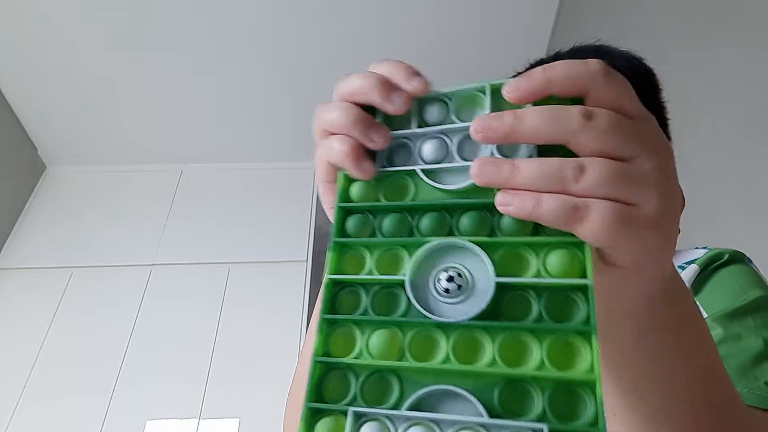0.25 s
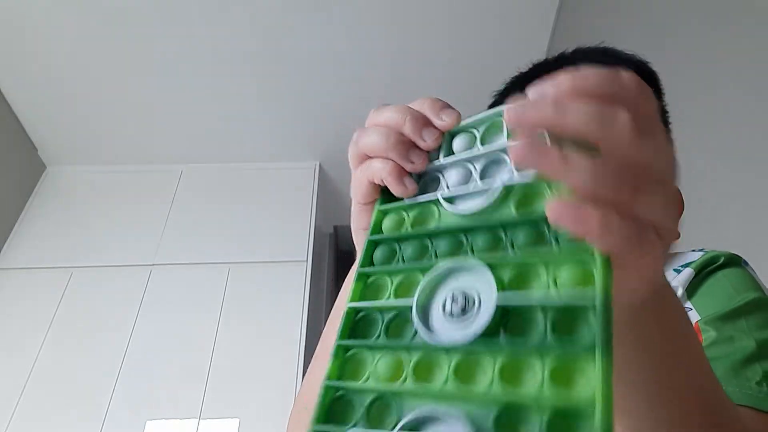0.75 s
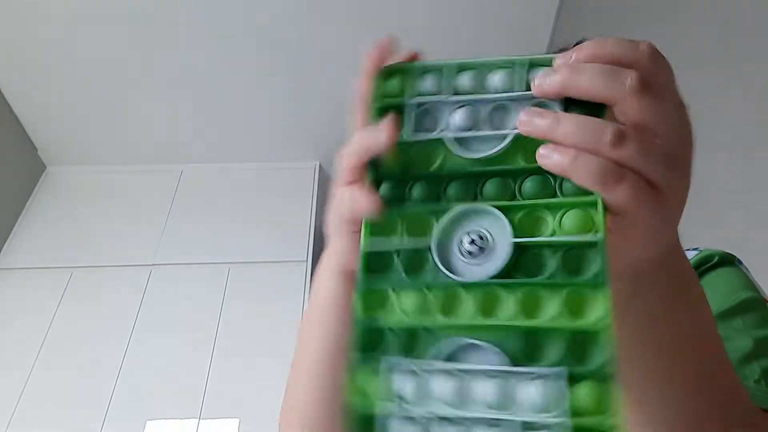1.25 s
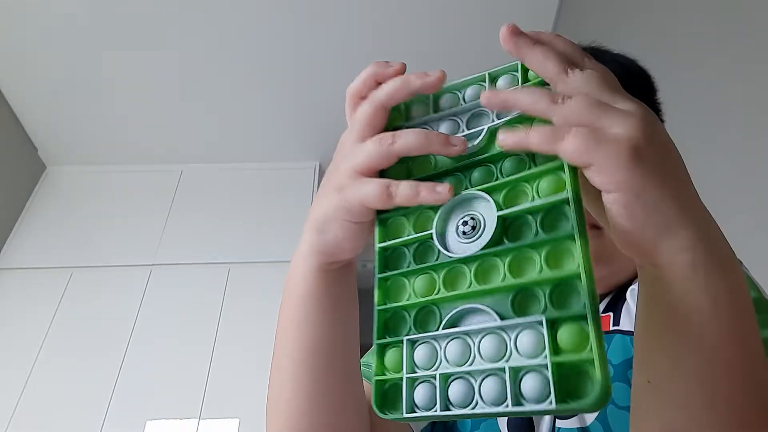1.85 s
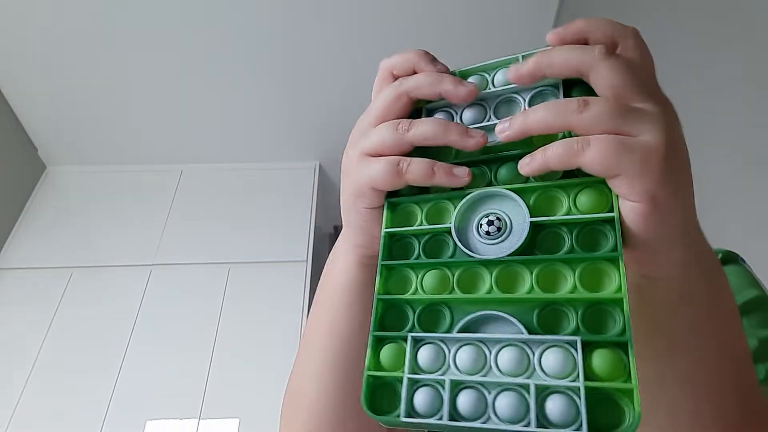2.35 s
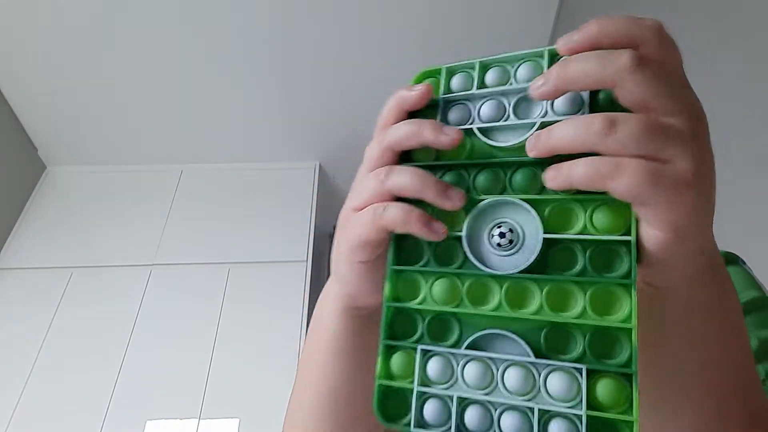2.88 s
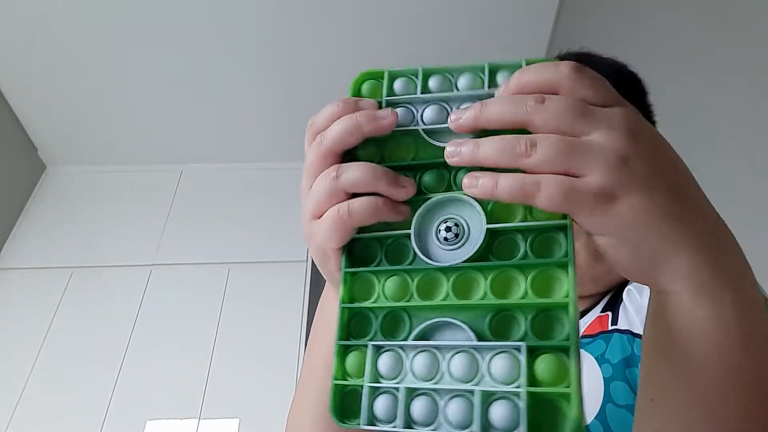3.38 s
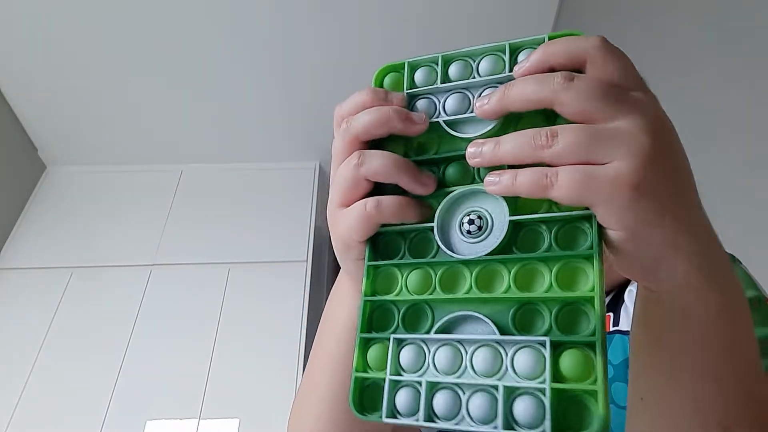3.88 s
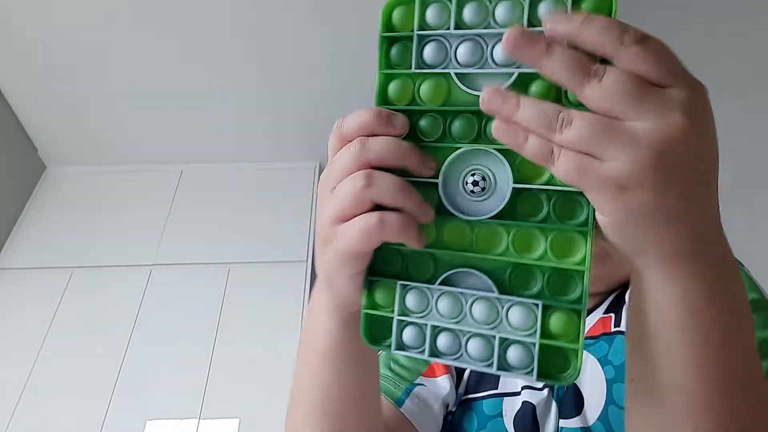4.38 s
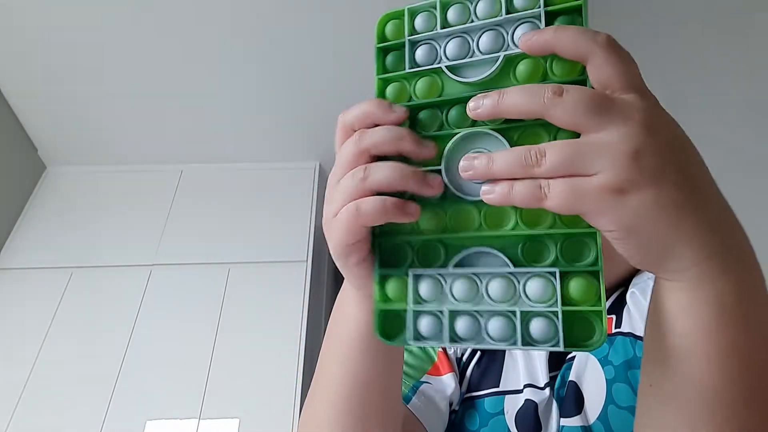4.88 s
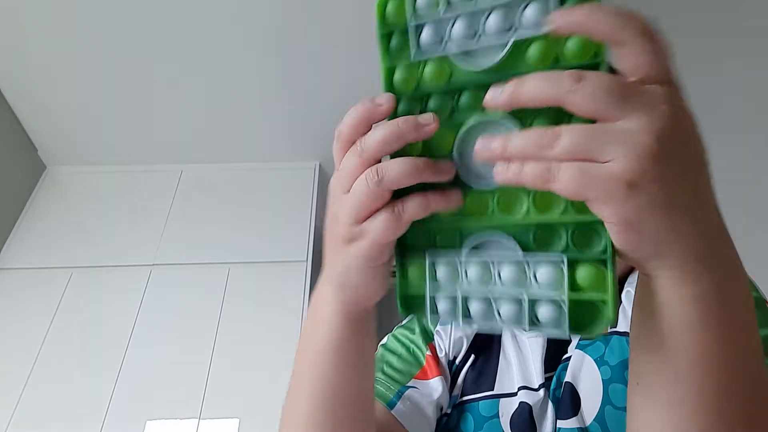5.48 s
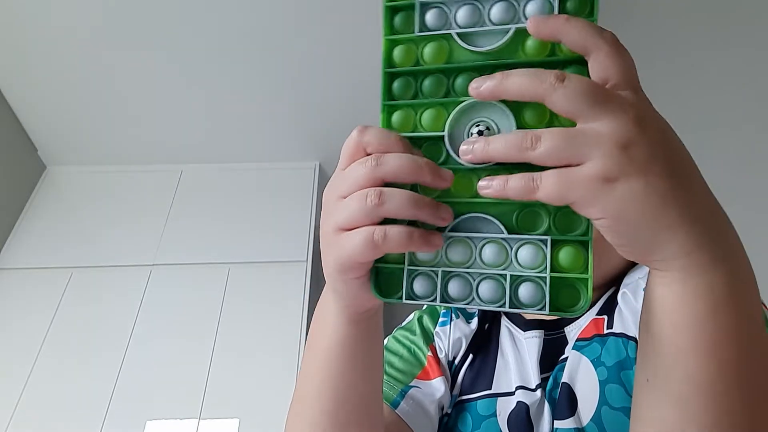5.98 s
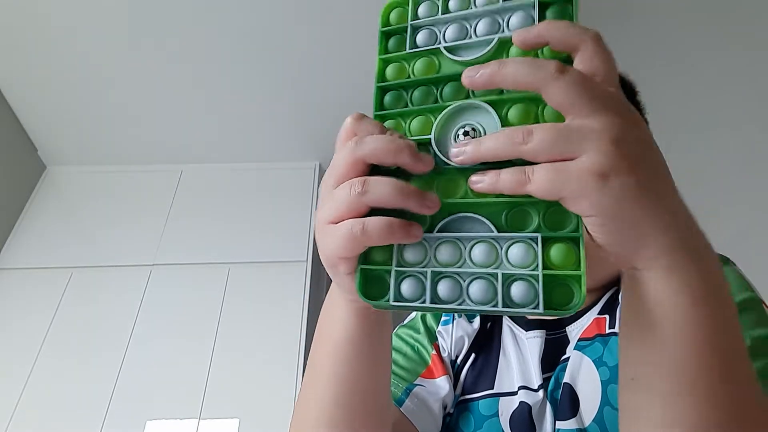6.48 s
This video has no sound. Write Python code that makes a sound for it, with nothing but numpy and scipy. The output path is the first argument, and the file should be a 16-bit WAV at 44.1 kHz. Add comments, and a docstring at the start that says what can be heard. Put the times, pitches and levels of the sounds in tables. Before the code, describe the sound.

Close stereo sound of fingers popping silicone bubbles in a small, hard-walled room, slightly left of centre. Quiet air, a very faint low hum and soft handling rumble run throughout. A brief rub opens, then crisp hollow pops at 0.24, a quick double snap at 0.68, and 1.03. Light fingertip ticks patter from 1.1 to 1.4. After a gap, pops follow at 1.98, 2.34 and 2.50, then 3.03. Soft touches and a dull thump come around 3.7. Two strong pops hit at 4.0 and 4.08, the second loudest, with a low thump just after. Faint taps and skin rubs lead to a pop at 4.86, a weak crackly double with a thump at 5.2, and a ringing pop at 5.31. Quiet rubbing and touches follow, then a soft pop at 6.16 and clear ones at 6.27, 6.43 and 6.55. Each is millisecond-sharp, rubbery, with a short bright reverberation.

```python
"""Silicone domes of a popping toy buckle under the fingers, close to a microphone in a small room.
Each snap-through is a millisecond pulse of air with brief resonances; wall echoes and a diffuse tail answer.
Fingertip impacts tick on the rubber, stick-slip friction rubs and hisses, and the sheet thumps dully,
alone or under a pop; handling rumble, still air and a faint hum lie underneath.
Filtered noise makes the random sounds, minimum-phase pulses the impacts and sines the hum."""
import sys
import numpy as np
from scipy import signal
from scipy.fft import rfft, irfft
from scipy.io import wavfile

SR = 44100
rng = np.random.default_rng(int(sys.argv[2]) if len(sys.argv) > 2 else 0)


def put_to_file(sound):
    """Save the sound as 16-bit audio at rate SR, in the file named by the first command-line argument."""
    columns = np.atleast_2d(sound).T  # one column per channel
    safe = np.clip(columns, -1, 1)
    whole_steps = np.round(safe * 32767)
    wavfile.write(sys.argv[1], SR, whole_steps.astype(np.int16))


N = 297234

# One snap a row; a dome that flips in two steps has two rows.
# Ring and zing are its low and high resonance, top is where its treble falls:
#   t/s, level/dB, ring f/Hz, ring/dB, zing f/Hz, zing/dB, hollow f/Hz, hollow/dB,
#   snap/dB above 1.9 kHz, crack/dB above 4.5 kHz, top f/Hz,
#   near echo delay/ms, near echo factor, room level/dB, room treble/dB
POPS = [(0.239, 9.5, 1087, 9, 4200, 10.5, 434, -5.5, 6, -10.5, 10650, 0.96, 0.2, 1.5, 0.5),
        (0.6746, 7, 1084, 7, 7950, 11, 690, -0.5, 14.5, -15, 12680, 1.5, -0.32, 3.5, 4.5),
        (0.6828, 13, 1544, 5, 8320, 9.5, 708, -8, 7, 5, 14100, 1.24, 0.67, -10.5, 3),
        (1.0284, 11, 600, 2, 6950, 7, 894, -17, 7.5, -12, 13000, 2.2, -0.28, -2.5, 5.5),
        (1.9779, 14, 636, 4.5, 2800, 2, 958, -15, 8.5, -6, 8700, 0.94, 0.27, 0.5, -4.5),
        (2.344, 10.5, 941, 4.5, 4400, 7.5, 678, -5.5, 11.5, -23, 11200, 0.93, 0.26, -1, 3.5),
        (2.5043, 14, 1419, 5, 4350, 9, 832, -5, 1.4, -11.5, 9350, 2.18, -0.3, -2.5, 7.5),
        (3.0253, 10, 1026, 10.5, 3460, 7, 900, -18.5, 1.5, -7.5, 8370, 2.24, -0.22, -1.5, 12.5),
        (3.9957, 17, 1071, 6.6, 7100, 7, 820, -9.5, 9.5, -19, 13700, 0.51, 0.2, -3.5, 4.5),
        (4.0756, 24, 1025, 3, 7060, 10, 2450, -7, 1.2, -9, 10350, 2.18, -0.14, -6.5, 2.5),
        (4.8605, 9, 1490, 8, 3420, 2, 896, -12.5, 6, -1, 7070, 0.66, -0.18, -2, 1),
        (5.1968, -10.5, 900, -10, 8300, 12.5, 1700, -9, -4.5, 18.5, 11630, 0.91, 0.11, 0, -6),
        (5.1993, -2, 1284, 6.5, 4120, 5, 2760, -24, 0.5, 1.5, 11500, 0.87, 0.23, -1, 4),
        (5.3104, 9.5, 902, 11, 5360, 13.5, 1782, -14, 9, -15, 10390, 1.55, 0.26, 0, 5.5),
        (6.156, -6, 1300, 14.5, 7200, 6, 2100, -21.5, 2, 9.5, 6030, 1.52, -0.18, 0.5, 1),
        (6.2733, 12, 1250, 5.5, 5050, 10, 463, -2.5, 2.5, -9, 13600, 2.15, 0.33, -2, 3),
        (6.4252, 7.5, 1330, 10.5, 6740, 15, 1850, -7.5, 11, -9.5, 16100, 2.33, -0.33, -1, 1.5),
        (6.5498, 16.5, 626, 6, 3210, 13, 2196, -23.5, -1, -3, 10500, 0.89, 0.38, -3, 2)]
# Spectrum common to all domes, before each pop's own level: f/Hz, level/dB
DOME_SPECTRUM = [(20, -42), (100, -25), (170, -25.5), (215, -37), (310, -14), (620, -4.5), (1200, -0.5),
                 (2100, -8), (3200, -21.5), (3800, -27), (4400, -28.5), (7500, -34.5), (10000, -38),
                 (15000, -43)]
# Position of the pops and damping of their ring: t/s, left-right level/dB, ring half-width / ring frequency
PLACE = [(0.24, 4.5, .09), (0.8, 7, 0.048), (2.3, 3, 0.13), (4.05, 4, 0.075), (4.86, 2.3, 0.073),
         (5.3, 3.5, 0.19), (6.2, 2.5, 0.26)]
# Fingertips landing on or leaving the rubber, before the common trim and panning:
#   t/s, peak level/dB, ring f/Hz, treble/dB, thud/dB
TAPS = [(0.403, -48.5, 854, -1.5, -8), (1.113, -39, 1735, 14.5, -2.5), (1.174, -41, 1925, 17, -13),
        (1.215, -50.5, 1240, 10, -12), (1.314, -56.5, 1840, 6, -4), (1.359, -46, 1760, -22, -5.5),
        (1.377, -44, 1796, -14, -3.5), (1.417, -49, 832, -18, 0.5), (2.102, -39, 1830, 3, 1),
        (2.132, -51, 972, 0.5, 8), (2.26, -59, 1765, -1, 6.5), (3.175, -55, 876, -0.5, 3.5),
        (3.25, -53, 923, -13.5, 7), (3.701, -50, 845, -2.5, -3), (4.172, -43.5, 2140, 10, -11),
        (4.252, -42, 1000, -5, 4), (4.356, -51, 1200, -11.5, 10), (4.373, -46.5, 1073, -27, 16),
        (4.457, -54, 1773, -9, 22), (4.647, -52.5, 1018, -8, 7), (4.91, -47, 1083, -1, 11),
        (4.996, -43.5, 1800, 0.5, -6.5), (5.089, -55.5, 955, -6.5, -8), (5.451, -53.5, 1150, 2, -2),
        (5.922, -50, 953, 12, -11), (6.091, -52.5, 851, -12.5, 18), (6.237, -47, 1846, -15, 3)]
# Spectrum common to all taps: f/Hz, level/dB
TAP_SPECTRUM = [(60, -24.5), (300, -15), (600, -2), (1000, 0.5), (2200, 0.5), (2900, -9.5), (3800, -19.5),
                (7500, -26.5), (14000, -43.5)]
# Dull low thumps of the sheet, alone or under a pop: t/s, level/dB added to the thud spectrum
THUDS = [(3.698, -8.5), (3.713, -19.5), (3.751, -24), (4.106, -6.5), (5.202, -9.5)]
# Spectrum of the thumping sheet: f/Hz, level/dB
THUD_SPECTRUM = [(30, -37), (55, -14), (95, 3.5), (170, -3.5), (220, -6.5), (330, 4), (600, -14.5),
                 (1500, -28), (3500, -29), (5500, -30), (8000, -44.5), (15000, -57.5)]
# Skin sliding on silicone, before the common trims and panning: start t/s, length/s, rub level/dB, hiss level/dB
STROKES = [(0.0, 0.047, -53.5, -63.5), (0.087, 0.08, -74, -79), (1.298, 0.13, -67, -69.5),
           (2.6, .24, -74, -82), (4.309, 0.11, -61, -80.5), (4.422, .06, -70, -80),
           (4.688, 0.087, -72, -86.5), (5.085, 0.033, -63, -77), (5.585, 0.096, -63, -76),
           (5.713, 0.057, -62, -76.5), (5.953, 0.063, -74, -89.5), (6.193, 0.33, -65.5, -88)]
# Spectral shape of the stick-slip ticks: f/Hz, level/dB
RUB_SPECTRUM = [(300, -28.5), (700, -4), (1000, 7), (1400, -5.5), (1900, 3), (2700, -8), (3800, -22.5),
                (6000, -34)]
# Spectral shape of the friction hiss: f/Hz, level/dB
HISS_SPECTRUM = [(2500, -23.5), (5000, 1), (8000, 1.5), (10000, -6), (12000, -2.5), (16000, -14.5)]
# The hands shift their grip and the sheet sways: middle t/s, length/s, rumble level/dB
SHIFTS = [(0.264, 0.056, -58.5), (0.63, 0.077, -59.5), (0.924, 0.06, -63.5), (1.502, 0.11, -60.5),
          (2.56, 0.11, -63.5), (3.2, .45, -67.5), (3.38, 0.032, -63), (4.09, .08, -57.5),
          (4.75, 0.22, -64.5), (5.537, .06, -63.5)]
# Spectral shape of the sway: f/Hz, level/dB
SWAY_SPECTRUM = [(20, -36.5), (45, -9.5), (63, 0), (85, -4), (125, -11), (180, -16.5), (300, -33),
                 (900, -65)]
# Spectral shape of the handling rumble: f/Hz, level/dB
RUMBLE_SPECTRUM = [(15, -36.5), (30, -19), (46, -10), (62, 3), (80, -5), (120, -4), (175, -5.5), (215, -19),
                   (290, -13), (450, -32.5), (900, -54.5)]
# Spectral shape of the still air: f/Hz, level/dB
AIR_SPECTRUM = [(20, -17), (60, -3.5), (130, -2.5), (170, 0.5), (220, -6.5), (320, -2.5), (480, -10.5),
                (1000, -15.5), (2500, -23), (6000, -29.5), (9500, -29.5), (12000, -25.5), (15500, -28)]
# Steady hum tones: f/Hz, rms level/dB
HUM = [(63.5, -75.5), (316, -86.5)]
# Nearest walls and ceiling, against the sound sent into the room: delay/s, left level/dB, right level/dB
WALLS = [(0.0097, -22.5, -22.5), (0.018, -31.5, -28), (.021, -29.5, -37), (0.023, -27.5, -28),
         (.034, -28, -29.5), (0.0386, -30, -29)]
# Diffuse reverberation, against the sound sent into the room: f/Hz, level/dB, decay time t60/s
ROOM = [(99, -0.5, 0.99), (300, -13.5, 0.094), (710, -14, 0.27), (1170, -17, .29), (2160, -13.5, 0.24),
        (3140, -10, 0.26), (4400, -0.5, 0.25), (5900, -6, 0.24), (8150, -5.5, 0.23), (10000, -9, 0.27),
        (15000, -4.5, .22)]
# Difference of the two microphone ports for the pops: f/Hz, left-right level/dB
PORTS = [(200, 2), (1300, 1.5), (2200, 3), (3300, 0), (4500, -8), (7800, -8.5), (9800, 5), (14000, -4)]
# Balance of diffuse sound: f/Hz, left-right level/dB
DIFFUSE_PAN = [(50, -0.5), (300, 5.5), (1500, 3), (4000, 0), (8000, -1), (10500, 2.5), (15000, 1)]
# Correlation of diffuse sound between the ports: f/Hz, coefficient
LIKENESS = [(50, 0.78), (400, 0.8), (1000, 0.12), (2000, 0.033), (5000, 0.012)]

PULSE_SAMPLES = 4096
HZ = np.fft.rfftfreq(PULSE_SAMPLES, 1 / SR)
EDGE_HZ = 15800  # the microphone's upper band limit
PORT_LAG_S = 0.00002  # the toy is a little nearer the left port
AIR_DB = -75
HOLD_DB = -69.5  # rumble of hands that only hold the toy
JOLT_DB, JOLT_RISE_S, JOLT_FADE_S = -75.5, 0.015, 0.061  # shake of the sheet, level against the pop's level
STROKE_PEAK, STROKE_ENDS_DB = 0.1, -12  # loudest at this share of the length; ends against that peak
BRUSHES_PER_S, BRUSH_DB, BRUSH_SPREAD_DB, BRUSH_HZ = 6, -71, 2, 1700  # level before the taps' common trim
# All domes move about the same air, so a soft pop has more body: dB at level 0, dB lost per dB, limit
BODY_DB, BODY_SLOPE, BODY_MOST_DB = 13, 0.86, 7


def gain_of(db):
    """Amplitude ratio: 20 dB is a factor of ten."""
    return 10 ** (np.asarray(db) / 20)


def evened(x):
    """Power normalisation: scales to rms 1."""
    return x / np.sqrt(np.mean(x ** 2) + 1e-20)


def read(points, hz, order=1):
    """Interpolation of one table column on a logarithmic frequency axis."""
    table = np.transpose(points)
    return np.interp(np.log(hz + 1), np.log(table[0] + 1), table[order])


def add(mix, s, sound):
    """Superposition: adds a sound to the mix from time s."""
    part = mix[..., round(s * SR):][..., :sound.shape[-1]]
    part += sound[..., :part.shape[-1]]


def bell(hz, width):
    """Lorentzian resonance curve of height 1 and the given half-width."""
    return 1 / (1 + ((HZ - hz) / width) ** 2)


def above(hz, order):
    """High-pass weighting: a smooth step from 0 to 1 at hz."""
    return 1 / (1 + (hz / (HZ + 1)) ** order)


def pulse(db):
    """Minimum phase: the most sudden causal pulse with this spectrum."""
    both_halves = np.r_[db, db[-2:0:-1]]
    log_gain = np.log(gain_of(np.maximum(both_halves, -110)))
    return irfft(np.exp(np.conj(signal.hilbert(log_gain)))[:len(HZ)])


def sides(pan_db):
    """Constant-power panning: left and right dB for a left-right difference."""
    right_db = -10 * np.log10((1 + gain_of(pan_db) ** 2) / 2)
    return np.array([right_db + pan_db, right_db])


def coloured(x, spectrum):
    """Linear filtering by a spectrum, normalised to rms 1."""
    hz = np.fft.rfftfreq(N, 1 / SR)
    return evened(irfft(rfft(x) * gain_of(read(spectrum, hz)), N))


def diffuse(pair):
    """Spatial coherence of a diffuse field: two unrelated signals become alike in the bass."""
    size = pair.shape[1]
    hz = np.fft.rfftfreq(size, 1 / SR)
    a, b = rfft(pair)
    same = read(LIKENESS, hz)
    ports = np.array([a, same * a + np.sqrt(1 - same ** 2) * b])
    return irfft(ports * gain_of(sides(read(DIFFUSE_PAN, hz))), size)


def background(waver_rad=0.55):
    """Diffuse broadband noise of still air, and a hum of phase-modulated sines."""
    t = np.arange(N) / SR
    air = gain_of(AIR_DB) * coloured(diffuse(rng.standard_normal((2, N))), AIR_SPECTRUM)
    drift = np.interp(t, np.linspace(0, t[-1], 20), rng.standard_normal(20))
    hum = np.zeros(N)
    for hz, db in HUM:
        hum += gain_of(db) * np.sqrt(2) * np.sin(2 * np.pi * hz * t + waver_rad * drift)
    return air + hum


def rumble():
    """Forced vibration of the held sheet: steady, jolted by each pop, swaying at each shift of grip."""
    t = np.arange(N) / SR
    jolt_power, sway_gain = np.zeros(N), np.zeros(N)
    for s, db, *_ in POPS:
        time_constant = np.where(t < s, JOLT_RISE_S, JOLT_FADE_S)
        jolt_power += gain_of(db + JOLT_DB) ** 2 * np.exp(-2 * abs(t - s) / time_constant)
    for s, length, db in SHIFTS:
        sway_gain += gain_of(db) * np.exp(-2 * ((t - s) / length) ** 2)
    shake = coloured(diffuse(rng.standard_normal((2, N))), RUMBLE_SPECTRUM)
    shake = shake * np.sqrt(gain_of(HOLD_DB) ** 2 + jolt_power)
    return shake + coloured(rng.standard_normal(N), SWAY_SPECTRUM) * sway_gain


def rubs(slips_per_s=700, rub_trim_db=-2, hiss_trim_db=-4):
    """Stick-slip friction: skin on rubber gives tiny uneven ticks under a hiss, swelling with each stroke."""
    t, out = np.arange(N) / SR, np.zeros(N)
    ticks = (rng.random(N) < slips_per_s / SR) * rng.standard_normal(N)
    slips = coloured(ticks, RUB_SPECTRUM)
    hiss = coloured(rng.standard_normal(N), HISS_SPECTRUM)
    for s, length, slip_db, hiss_db in STROKES:
        ends_and_peak_db = [STROKE_ENDS_DB, 0, STROKE_ENDS_DB]
        swell_db = np.interp((t - s) / length, [0, STROKE_PEAK, 1], ends_and_peak_db, -np.inf, -np.inf)
        friction = slips * gain_of(rub_trim_db + slip_db) + hiss * gain_of(hiss_trim_db + hiss_db)
        out += gain_of(swell_db) * friction
    return out


def room(x, first_s=0.0093, rise_s=0.0027, full_s=0.025, near=0.13, echoes_per_s=6000):
    """Reverberation: wall reflections, then a dense exponential tail whose fine pattern drifts slowly with time."""
    size = SR * 2 // 3
    out, t = np.zeros((2, N)), np.arange(size) / SR
    for s, *levels_db in WALLS:
        add(out, s, gain_of(levels_db)[:, None] * x)
    # only hands and body reflect before the first wall answers
    build_s = [0, 0.002, first_s, first_s + rise_s, full_s]
    build = np.interp(t, build_s, [0, near, near, 0.6, 1])
    for k in range(3):
        sparse = rng.standard_normal((2, size)) * (rng.random((2, size)) < echoes_per_s / SR)
        hz, at, z = signal.stft(evened(diffuse(sparse)), SR, nperseg=256)
        t60 = read(ROOM, hz, order=2)[:, None]
        decay_db = read(ROOM, hz)[:, None] - 60 * (at - full_s) / t60
        unit_energy = np.sqrt(np.log(1e6) / (t60 * SR))
        z = z * gain_of(decay_db) * unit_energy
        tail = signal.istft(z, SR, nperseg=256)[1][:, :size] * build
        # three unrelated tails take turns at constant total power
        turn = np.sqrt(2 / 3) * np.cos(np.pi * (np.arange(N) / SR / 2 + k / 3))
        out += signal.fftconvolve((x * turn)[None], tail, axes=1)[:, :N]
    return out


def tap(db, hz, treble_db, thud_db, ring_db=11, ring_width_hz=150, scuff=0.23,
        landing_s=0.0044, scuff_s=0.0019, trim_db=-2):
    """Soft impact: a swelling scuff, a tick that excites the dome's resonance, then a dying scuff."""
    t = np.arange(-PULSE_SAMPLES // 2, PULSE_SAMPLES // 2) / SR  # the tick is at 0, mid-array
    pressure = np.exp(-abs(t) / np.where(t < 0, landing_s, scuff_s))
    colour = read(TAP_SPECTRUM, HZ) + ring_db * bell(hz, ring_width_hz)
    colour = colour + treble_db * above(4700, order=4) + thud_db * (1 - above(600, order=4))
    touch = (t == 0) + scuff * rng.standard_normal(len(t)) * pressure
    tick = signal.fftconvolve(touch, pulse(colour))[:len(t)]
    return gain_of(db + trim_db) * tick / abs(tick).max()


def brushes(treble_db=-2, thud_db=0):
    """Random point process: idle fingers graze the domes now and then."""
    when = rng.random(N) < BRUSHES_PER_S / SR
    strength = gain_of(BRUSH_SPREAD_DB * rng.standard_normal(N))
    return signal.oaconvolve(when * strength, tap(BRUSH_DB, BRUSH_HZ, treble_db, thud_db), "same")


def scattered(snap, share_db=-1, from_hz=2600, fade_s=0.0016):
    """Scattering: fingers and ribs of the sheet spread a snap's short waves over a few milliseconds."""
    t = np.arange(PULSE_SAMPLES) / SR
    paths = rng.standard_normal(PULSE_SAMPLES) * np.exp(-t / fade_s)
    short_waves = pulse(share_db + 20 * np.log10(above(from_hz, order=3)))
    spray = signal.fftconvolve(paths / np.linalg.norm(paths), short_waves)[:PULSE_SAMPLES]
    return snap + signal.fftconvolve(snap, spray)[:PULSE_SAMPLES]


def pops(snap_hz=1900, crack_hz=4500, body_hz=450, hollow_width_hz=70, zing_width_hz=300, top_db=-18,
         echo_top_hz=5000, room_ring=0.58, room_hollow=0.26, room_treble_hz=4000):
    """Snap-through buckling: each snap is an air pulse that rings; returns direct pair and room feed."""
    direct, spread = np.zeros((2, N)), np.zeros(N)
    place_s, pans_db, dampings = np.transpose(PLACE)
    for (s, db, ring_hz, ring_db, zing_hz, zing_db, hollow_hz, hollow_db, snap_db, crack_db, top_hz,
         echo_ms, echo, room_db, room_treble_db) in POPS:
        pan_db = np.interp(s, place_s, pans_db)
        ring_width_hz = ring_hz * np.interp(s, place_s, dampings)
        body_db = min(BODY_DB - BODY_SLOPE * db, BODY_MOST_DB)
        flip = db + read(DOME_SPECTRUM, HZ) + body_db * (1 - above(body_hz, order=4))
        # each pop has its own brightness and its own treble cut-off
        flip = flip + snap_db * above(snap_hz, order=4) + crack_db * above(crack_hz, order=6)
        flip = flip + top_db * above(top_hz, order=16)
        # the cup's main mode and a high one
        ring = ring_db * bell(ring_hz, ring_width_hz) + zing_db * bell(zing_hz, zing_width_hz)
        # front and back of the sheet cancel
        hollow = hollow_db * bell(hollow_hz, hollow_width_hz)
        # interference with the echo off hands and chest
        delay = np.exp(-2j * np.pi * HZ * echo_ms / 1000)
        comb = 20 * np.log10(abs(1 + echo * delay * (1 - above(echo_top_hz, order=2))))
        near_db = flip + ring + hollow + comb
        ports_db = sides(pan_db + read(PORTS, HZ))
        add(direct, s, -np.array([scattered(pulse(near_db + port_db)) for port_db in ports_db]))
        room_colour = room_db + room_treble_db * above(room_treble_hz, order=4)
        add(spread, s, -pulse(flip + room_ring * ring + room_hollow * hollow + room_colour))
    return direct, spread


def taps():
    """Impact excitation: the clear fingertip touches, each tick falling at its listed time."""
    out = np.zeros(N)
    for s, *touch in TAPS:
        add(out, s - PULSE_SAMPLES / 2 / SR, tap(*touch))
    return out


def thuds(flutter=0.035, flutter_s=0.012):
    """Damped impulse response: dull low thumps of the sheet, alone or under a pop, with a brief flutter."""
    out, t = np.zeros(N), np.arange(PULSE_SAMPLES) / SR
    for s, db in THUDS:
        push = (t == 0) + flutter * rng.standard_normal(len(t)) * np.exp(-t / flutter_s)
        add(out, s, signal.fftconvolve(push, pulse(db + read(THUD_SPECTRUM, HZ))))
    return out


def lagged(pair):
    """Propagation delay: near sounds reach the right port a moment later."""
    turn = np.exp(-2j * np.pi * np.fft.rfftfreq(N, 1 / SR) * PORT_LAG_S)
    return np.array([pair[0], irfft(rfft(pair[1]) * turn, N)])


def scene(touch_pan_db=5.5, touch_room_db=1):
    """Superposition of near pops and finger sounds, their reverberation, rumble and background."""
    direct, spread = pops()
    touch = taps() + brushes() + thuds() + rubs()
    near = lagged(direct + touch * gain_of(sides(touch_pan_db))[:, None])
    return near + room(spread + gain_of(touch_room_db) * touch) + rumble() + background()


def record(dry):
    """Band limitation: the microphone as a linear-phase low-pass filter."""
    low_pass = signal.firwin(511, EDGE_HZ, window=("kaiser", 9), fs=SR)
    return signal.oaconvolve(dry, low_pass[None], "same")


dry = scene()
out = record(dry)
put_to_file(out)
```